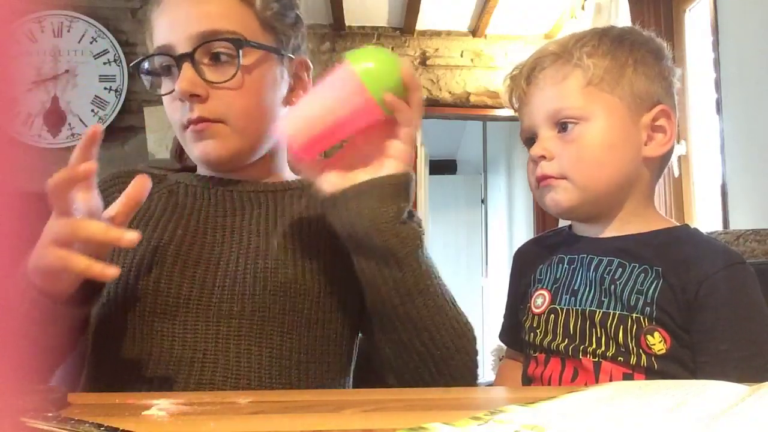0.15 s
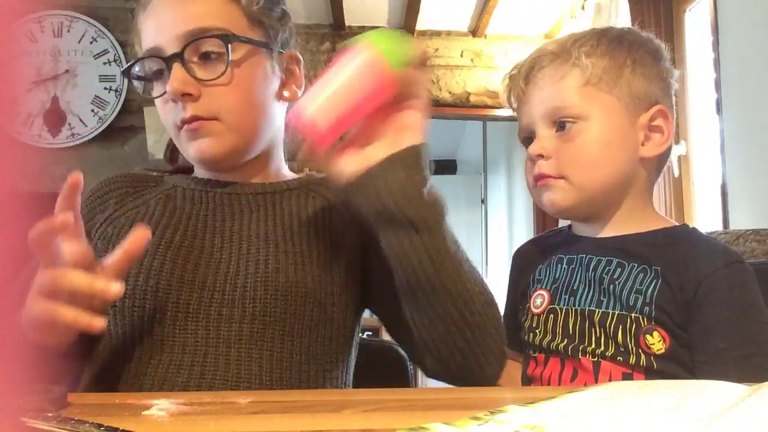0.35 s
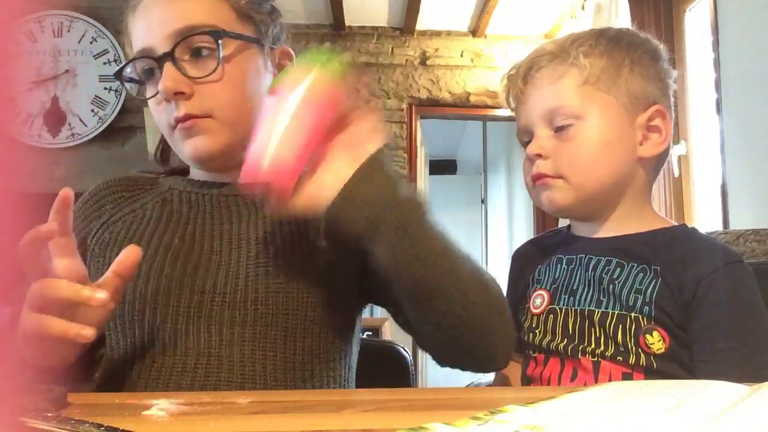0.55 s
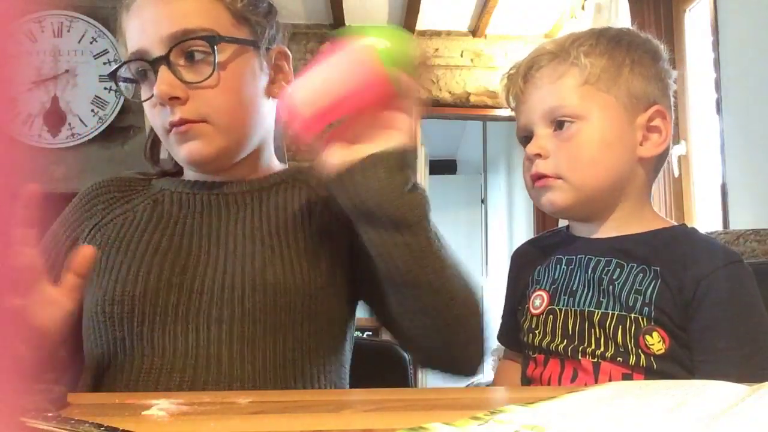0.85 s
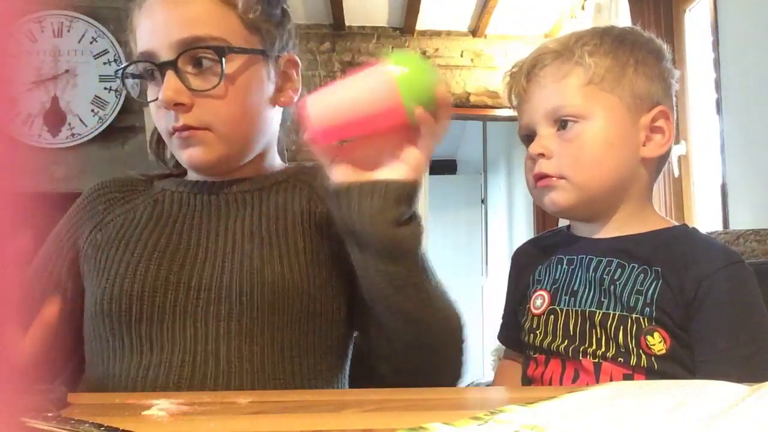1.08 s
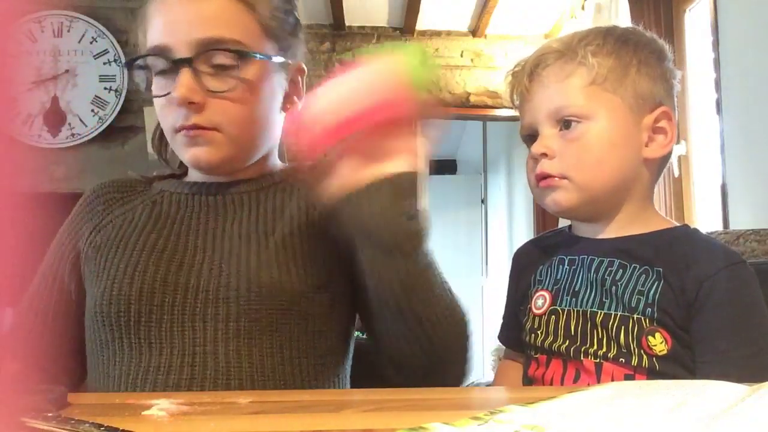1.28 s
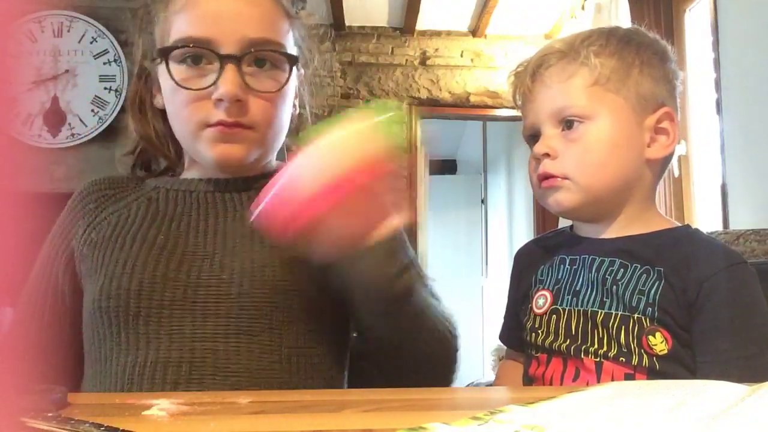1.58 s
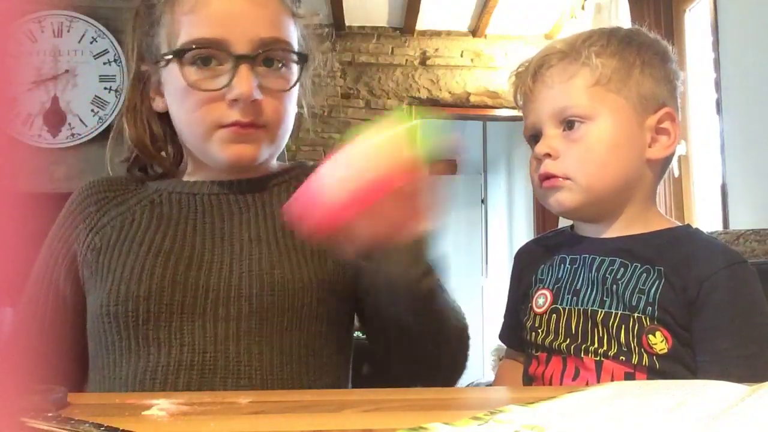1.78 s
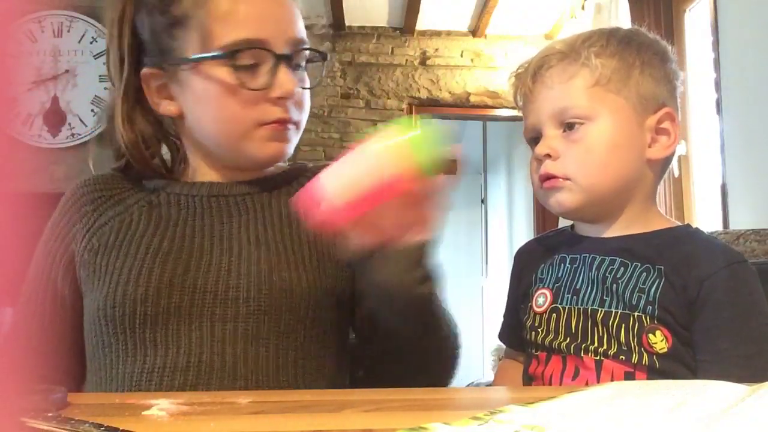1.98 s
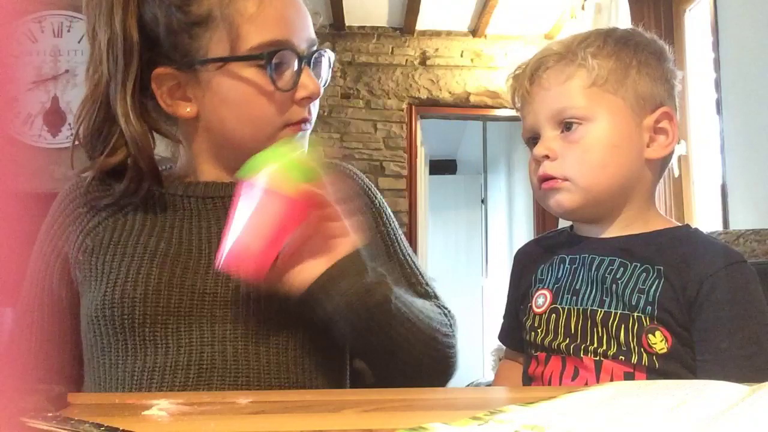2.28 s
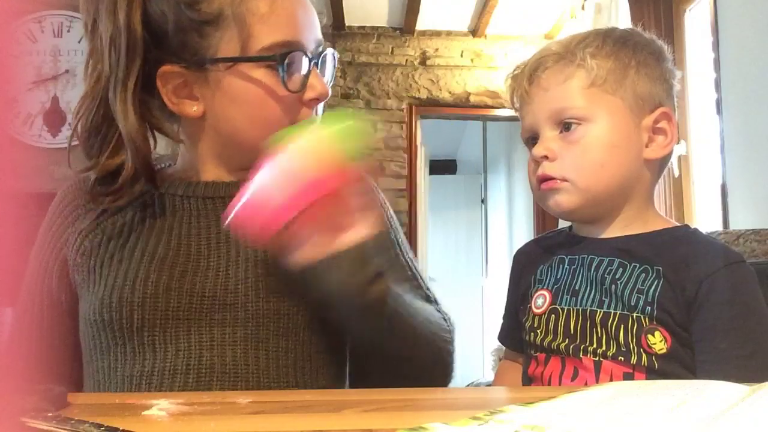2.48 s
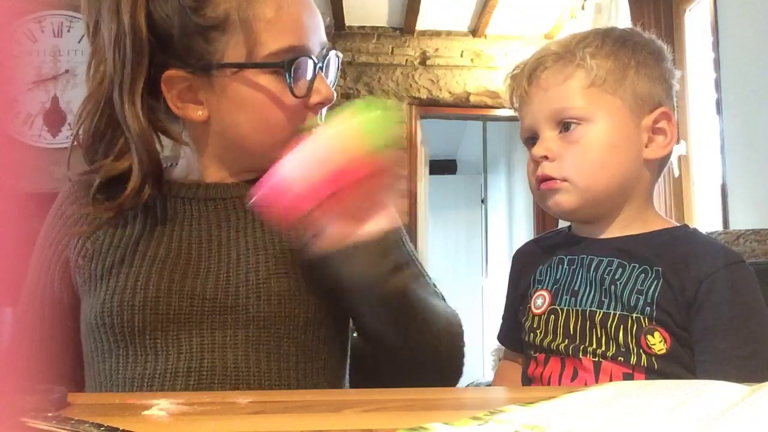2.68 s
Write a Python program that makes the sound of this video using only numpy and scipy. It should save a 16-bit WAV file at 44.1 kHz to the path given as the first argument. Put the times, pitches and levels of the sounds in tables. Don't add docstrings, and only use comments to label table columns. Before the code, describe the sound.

A plastic cup of slush is shaken by hand, slapping, knocking and rattling irregularly indoors

```python
import sys
import numpy as np
from scipy import signal
from scipy.fft import rfft, irfft
from scipy.io import wavfile
from scipy.ndimage import uniform_filter1d

SR = 44100
rng = np.random.default_rng(int(sys.argv[2]) if len(sys.argv) > 2 else 0)


def gain_from_db(level_db):
    decades = np.asarray(level_db, float) / 20
    return 10 ** decades


def dump(signal):
    limited = np.clip(np.atleast_2d(signal).T, -1, 1)
    pcm = np.round(limited * 32767).astype(np.int16)
    wavfile.write(sys.argv[1], SR, pcm)


N = 125685

# t/s, peak level/dB, centre f/Hz, brightness/dB
SLAPS = [(0.1053, -54, 5380, -3), (0.197, -48.5, 4440, 8), (0.228, -39, 4970, -4),
         (0.334, -37.5, 3900, 6), (0.3415, -25, 4550, 17.5), (0.4519, -43, 4700, 5),
         (0.4614, -43.5, 3600, -18), (0.5376, -49, 5560, 15), (0.559, -36.5, 4470, 14),
         (0.636, -36, 4660, -1), (0.7317, -52, 4960, 4), (0.7812, -32.5, 4530, 9),
         (0.7975, -46, 5860, 3), (0.8777, -35.5, 4520, 8.5), (1.0044, -45.5, 4660, 11),
         (1.0177, -40, 4940, 12), (1.0933, -43.5, 4000, 8), (1.106, -34.5, 4200, 10.5),
         (1.2159, -45, 5140, 17), (1.241, -41.5, 4400, -4), (1.3027, -34.5, 4500, 8),
         (1.3242, -38, 4400, 11), (1.3364, -41, 3770, 0.1), (.667, -34.5, 2600, -32),
         (1.071, -53.5, 7250, 20),
         (1.4526, -43.5, 3480, 2), (1.4619, -35.5, 5200, 5.5), (1.5279, -39, 4260, 5),
              (1.5492, -28.5, 4730, -0.5), (1.561, -43, 4580, -36), (1.6734, -33, 5350, 7.5),
              (1.6831, -38, 5200, 19), (1.79, -47, 4440, 19.5), (1.895, -54, 6400, 11),
              (1.9025, -44, 4460, 22), (1.9108, -38.5, 5000, 16.5), (1.9738, -41, 4400, 0.5),
              (2.062, -50, 4080, 0), (2.148, -47, 5150, 12), (2.2267, -51, 4930, -2),
              (2.2345, -38, 5070, 10), (2.3281, -36, 4440, 12), (2.332, -35.5, 5600, 16.5),
              (2.4404, -54.5, 5440, 18), (2.4663, -49, 4560, -6), (2.514, -52.5, 5200, 6),
              (2.56, -45.5, 4880, -5), (2.568, -42, 4760, 15.5), (2.5767, -45, 4430, 13),
              (2.68, -54.5, 3750, 4), (2.7795, -42.5, 5100, 15.5), (2.813, -51, 3380, -18)]
# t/s, peak level/dB, f/Hz, ring/cycles
PLOPS = [(0.228, -41.5, 804, 8.7), (0.3405, -24.5, 817, 5.1), (0.547, -50.5, 790, 9.9),
         (0.633, -31.5, 1085, 12), (0.781, -46, 980, 2.5), (0.8775, -24.5, 917, 9.5),
         (1.105, -42.5, 930, 8.5), (1.224, -41.5, 895, 26), (1.241, -47.5, 780, 29), (1.302, -43.5, 950, 5),
         (1.464, -49.5, 770, 13), (1.679, -38.5, 900, 13), (1.688, -42.5, 1105, 37), (1.91, -33, 666, 15),
         (1.972, -49, 1022, 31), (2.146, -34.5, 718, 18.6), (2.233, -42, 857, 5.6), (2.25, -48, 795, 11),
         (2.33, -40.5, 768, 14), (2.566, -41, 392, 2.4), (2.687, -49, 840, 10.4), (2.78, -43, 418, 2),
         (2.842, -51.5, 850, 8.3), (1.429, -56.5, 560, 5.3), (.255, -60.0, 190, 5.4),
         (.342, -42.5, 428, 8.2), (2.574, -48, 725, 1.7)]
# t/s, peak level/dB, f/Hz, ring/cycles
KNOCKS = [(0.1031, -48.5, 1660, 7.8), (0.2304, -42.5, 3370, 6.3), (0.3405, -29.5, 1730, 22),
          (0.445, -41.5, 1390, 2.1), (0.4518, -41, 2680, 8.6), (0.4632, -36, 2000, 5.7),
          (0.5537, -46, 2040, 4), (0.5625, -48, 1800, 8), (0.6341, -32, 1590, 8.8), (0.6667, -31, 2140, 7),
          (0.674, -36.5, 1930, 22), (0.688, -38, 2500, 11), (0.701, -45, 2850, 15),
          (0.7965, -48, 3460, 7.1), (0.8786, -31.5, 1345, 8.4), (1.0195, -41, 2740, 8.4),
          (1.021, -41, 1580, 6.2), (1.1057, -28, 2040, 11), (1.106, -23.5, 1683, 16),
          (1.3027, -32.5, 2100, 3.6), (1.2416, -42.5, 2230, 9), (1.3236, -36, 1820, 7.6),
          (1.5273, -40.5, 2230, 2.6), (1.6755, -41.5, 2200, 12), (1.6815, -31.5, 2270, 58),
          (1.704, -40.5, 2390, 25), (1.7401, -38, 2580, 9.2), (1.7929, -45, 1900, 2.5),
          (1.9087, -38.5, 1997, 16), (2.0602, -48, 2430, 6.6), (2.147, -43, 1550, 13),
          (2.2347, -37.5, 2180, 34), (2.2514, -38, 2060, 14), (2.3386, -28.5, 2064, 4.5),
          (2.4606, -41.5, 2330, 18), (2.5167, -41.5, 2050, 4.1), (2.576, -43.5, 1630, 22),
          (2.7872, -42.5, 1880, 50)]
# t/s, peak level/dB, f/Hz, ring/cycles
TICKS = [(.198, -46, 4760, 17), (1.4535, -46, 3520, 6), (.335, -40, 3980, 11), (.3415, -25.5, 4650, 23),
         (.4365, -46, 4700, 6), (.454, -38.5, 4740, 24), (.4645, -38, 3770, 21), (.5465, -55, 7500, 6),
         (.554, -44, 4000, 8.7), (.5625, -35, 4170, 13), (.569, -36.5, 5070, 18), (.6675, -33.5, 4100, 22),
         (.7325, -47.5, 5140, 20), (.7812, -36, 4860, 19), (.7825, -40, 3950, 30), (.797, -27.5, 6160, 23),
         (.803, -35.5, 4970, 18), (.886, -42, 5000, 20), (1.2167, -40, 5400, 5), (1.24, -43, 5500, 8.9),
         (1.248, -34, 3750, 32), (1.2485, -40, 5160, 16), (1.3035, -33.5, 5630, 7), (1.325, -37, 4740, 8.8),
         (1.336, -34, 4300, 20), (1.4085, -50, 4800, 17), (1.535, -45, 4560, 8), (1.5505, -28.5, 4700, 20),
         (1.553, -31, 4620, 23), (1.5585, -36, 4930, 28), (1.565, -48, 4900, 23), (1.674, -30, 5486, 18),
         (1.9035, -40, 2030, 9.4), (1.9605, -44, 5030, 7.3), (2.004, -54, 1740, 6),
         (2.027, -53.5, 1700, 4.4), (2.226, -49, 2330, 6.1), (2.2365, -37.5, 1583, 19),
         (2.3055, -51, 4800, 8.9), (2.306, -54, 2100, 2.8), (2.3285, -33, 5040, 8),
         (2.332, -26.5, 5700, 5.9), (2.349, -34, 5700, 6.4), (2.4668, -40, 2560, 13),
         (2.467, -43, 4740, 8.7), (2.467, -51, 795, 2.5)]
# t/s, peak level/dB
FOOTFALLS = [
    (0.2, -70.5),
    (1.747, -62),
    (1.965, -58.5),
    (2.025, -61.5),
    (2.302, -57.5),
    (2.396, -52.5),
    (2.467, -69),
]
# f/Hz, level/dB, t60/s
BOARDS = [(82, 5, 0.31), (95.7, -0.5, 0.23), (151, -1.5, 0.15), (282, 0.5, 0.12)]
# f/Hz, t60/s
ROOM_T60 = [(200, 0.25), (700, 0.22), (2000, 0.34), (5000, 0.42), (12000, 0.26)]
# f/Hz, density/dB per Hz
HISS = [(30, -9.5), (90, 0), (250, -2), (700, -6.5), (2000, -15.5), (5500, -9), (9000, -22), (15000, -32)]

SLAP_WIDTH_HZ, SWELL_S, SPRAY_T60_S, MIST_T60_S = 1346, 0.0023, 0.068, 0.049
CRACK_DB, CRACK_T60_S = -2, 0.002
BROAD_DB, AIR_DB = -17, -40.5
DROPS_PER_S, DROP_SPREAD_DB, CLUMP_DB = 5000, 3, 4
PITCH_RISE, CLICK_DB, RATTLE_T60_S = 0.09, -21.5, 0.07
POCKET_RATTLE_DB, TICK_RATTLE_DB = -11, -26
SLOSH_DB, SLOSH_FROM_S = -75, 0.21
ROOM_DB, FIRST_ECHO_S = -8.5, 0.005
EARLY_DB, EARLY_T60_S = 3.5, 0.073
STEP_SOFT_HZ, HISS_DB = 250, -75
MIC_BASS_HZ = 147
MIC_PEAK_HZ, MIC_PEAK_WIDTH_HZ, MIC_PEAK_DB = 4900, 1200, -13.5
MIC_DIP_HZ, MIC_DIP_WIDTH_HZ, MIC_DIP_DB = 1325, 246, -9.5
STEP_HZ, STEP_DOWN_DB, CUTOFF_HZ = 15750, -3, 16550


def rms_one(x):
    return x / np.sqrt(np.mean(x ** 2) + 1e-20)


def peak_one(x):
    return x / np.abs(x).max()


def at_hz(points, hz):
    table_hz, value = np.transpose(points)
    return np.interp(np.log(hz), np.log(table_hz), value)


def fade(t, t60_s):
    return gain_from_db(-60 * t / max(t60_s, 1e-3))


def butter(x, hz, kind):
    return signal.sosfilt(signal.butter(2, hz, kind, fs=SR, output="sos"), x)


def resonate(x, hz, width_hz):
    r = np.exp(-np.pi * width_hz / SR)
    zeros = np.array([1, 0, -1]) * (1 - r * r) / 2
    poles = [1, -2 * r * np.cos(2 * np.pi * hz / SR), r * r]
    return signal.lfilter(zeros, poles, x)


def add(out, start_s, sound, peak_db):
    i = int(start_s * SR)
    out[i:i + len(sound)] += gain_from_db(peak_db) * peak_one(sound)


def drops(rows, size):
    size_db = DROP_SPREAD_DB * np.minimum(rng.exponential(1, (rows, size)), 4)
    clicks = gain_from_db(size_db) * rng.choice([-1, 1], (rows, size))
    clumps = gain_from_db(CLUMP_DB * rng.standard_normal((rows, size // 100)))
    clumps = uniform_filter1d(np.repeat(clumps, 100, axis=1), size=60)
    landed = rng.random((rows, size)) < DROPS_PER_S / SR
    return clicks * clumps * landed


def slaps():
    events = SLAPS
    out, t = np.zeros(N + SR), np.arange(6000) / SR
    swell = 1 - np.exp(-t / SWELL_S)
    showers = drops(len(events), len(t))
    noises = rng.standard_normal((len(events), len(t)))
    for (start_s, db, hz, bright_db), shower, noise in zip(events, showers, noises):
        spray = rms_one(shower) * fade(t, SPRAY_T60_S) * swell
        crack_db = CRACK_DB + 0.5 * (db + 54.5)
        burst = spray + gain_from_db(crack_db) * noise * fade(t, CRACK_T60_S)
        wall = burst
        for widening in (1, 2.3, 1.93):
            wall = resonate(wall, hz, widening * SLAP_WIDTH_HZ)
        mist = 0.15 * burst + noise[::-1] * fade(t, MIST_T60_S)
        air = gain_from_db(AIR_DB + bright_db) * butter(mist, [6800, 14500], "band")
        broad = gain_from_db(BROAD_DB + 0.5 * bright_db) * butter(burst, [900, 3500], "band")
        add(out, start_s, wall + air + broad, db)
    return out[:N]


def pockets(events, rattle_db):
    out, t = np.zeros(N + SR), np.arange(4000) / SR
    for (start_s, db, hz, cycles), clicks in zip(events, drops(len(events), len(t))):
        t60_s = cycles / hz
        phase = 2 * np.pi * hz * (t + PITCH_RISE * t * t / t60_s)
        attack = (1 - np.exp(-2.6 * t * hz)) ** 2
        ring = np.sin(phase) * fade(t, t60_s) * attack
        rattle = resonate(clicks * fade(t, RATTLE_T60_S), 1.07 * hz, hz)
        rattle = resonate(rattle, 0.92 * hz, hz)
        impulse = np.arange(len(t)) == int(SR / hz / 2)
        click = butter(resonate(impulse, hz, 4.8 * hz), 2 * hz, "low")
        sound = peak_one(ring) + gain_from_db(rattle_db) * peak_one(rattle)
        sound = sound - gain_from_db(CLICK_DB) * click / click.max()
        add(out, start_s + 0.7 / hz, sound, db)
    return out[:N]


def slosh():
    grains = drops(1, N // 100 * 100 + 100)[0, :N]
    wash = rms_one(butter(grains, [500, 3000], "band"))
    onset = np.clip(10 * (np.arange(N) / SR - SLOSH_FROM_S), 0, 1)
    return gain_from_db(SLOSH_DB) * wash * onset


def room(x):
    t, echo = np.arange(SR // 2) / SR, 0
    edges_hz = 100 * 2 ** np.arange(0, 7.6, 0.5)
    white = rng.standard_normal((2, 4, len(t)))
    for k, (low, high) in enumerate(zip(edges_hz, edges_hz[1:])):
        band = butter(white[k % 2], [low, high], "band")
        echo = echo + band * fade(t, at_hz(ROOM_T60, np.sqrt(low * high)))
    onset = np.clip(t / FIRST_ECHO_S - 1, 0, 1)
    echo = echo * onset * (1 + gain_from_db(EARLY_DB) * fade(t, EARLY_T60_S))
    echo = echo / np.sqrt(np.sum(echo[0] ** 2))
    place = np.arange(N) // 170 % 4 == np.arange(4)[:, None]
    place = np.sqrt(uniform_filter1d(1.0 * place, size=120))
    return signal.fftconvolve(x * place, echo, axes=1)[:, :N].sum(axis=0)


def footfalls():
    out, t = np.zeros(N + SR), np.arange(16000) / SR
    hum = sum(gain_from_db(db) * np.sin(2 * np.pi * hz * t) * fade(t, t60_s) for hz, db, t60_s in BOARDS)
    hum = hum * (1 - np.exp(-t * STEP_SOFT_HZ))
    for start_s, db in FOOTFALLS:
        add(out, start_s, hum, db)
    return butter(out[:N], 60, "high")


def hiss():
    hz = np.maximum(np.arange(N // 2 + 1) * SR / N, 1)
    spectrum = rfft(rng.standard_normal(N)) * gain_from_db(at_hz(HISS, hz))
    return gain_from_db(HISS_DB) * rms_one(irfft(spectrum, N))


def scene():
    cup = pockets(PLOPS, POCKET_RATTLE_DB) + pockets(KNOCKS, POCKET_RATTLE_DB)
    cup = cup + slaps() + slosh() + pockets(TICKS, TICK_RATTLE_DB)
    cup = butter(cup, MIC_BASS_HZ, "high")
    return (cup + gain_from_db(ROOM_DB) * room(cup) + footfalls() + hiss())[None, :]


def top_cut(x):
    return signal.sosfilt(signal.butter(12, 16500, fs=SR, output="sos"), x)


def record(dry):
    x = dry + gain_from_db(MIC_PEAK_DB) * resonate(dry, MIC_PEAK_HZ, MIC_PEAK_WIDTH_HZ)
    x = x + 0.81 * resonate(dry, 8060, 1240)
    x = x - gain_from_db(MIC_DIP_DB) * resonate(x, MIC_DIP_HZ, MIC_DIP_WIDTH_HZ)
    hz = np.arange(N // 2 + 1) * SR / N
    top = np.where(hz > STEP_HZ, gain_from_db(STEP_DOWN_DB), 1) * (hz < CUTOFF_HZ)
    x = irfft(rfft(x) * top, N)
    return top_cut(x)


dry = scene()
out = record(dry)
dump(out)
```